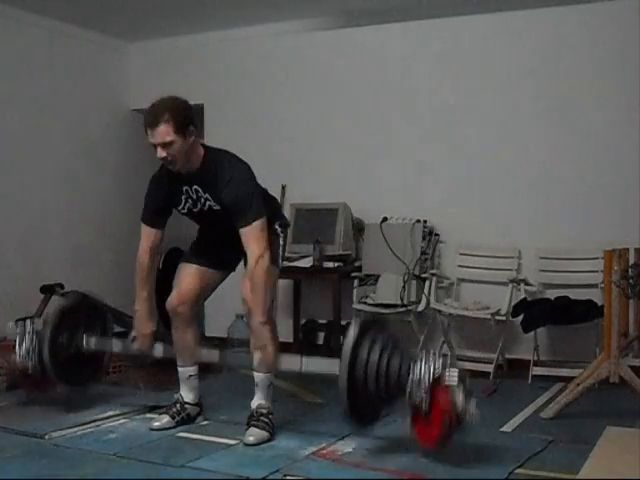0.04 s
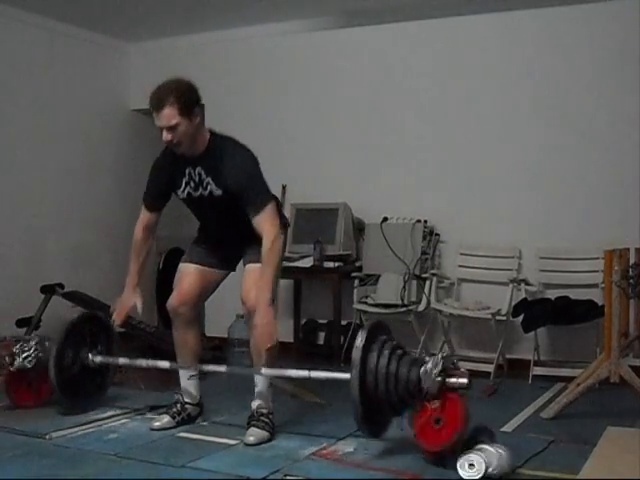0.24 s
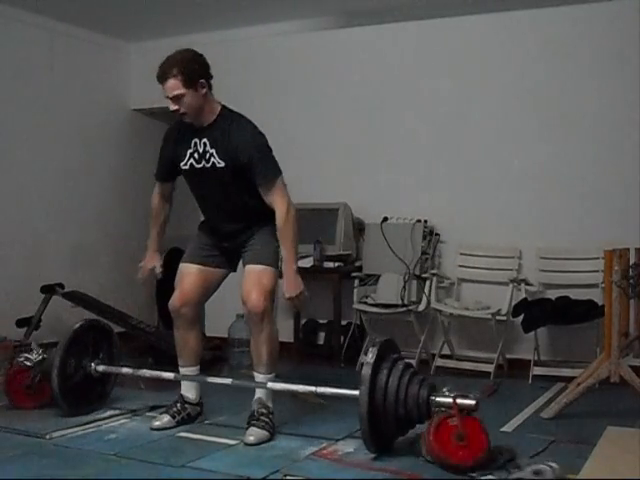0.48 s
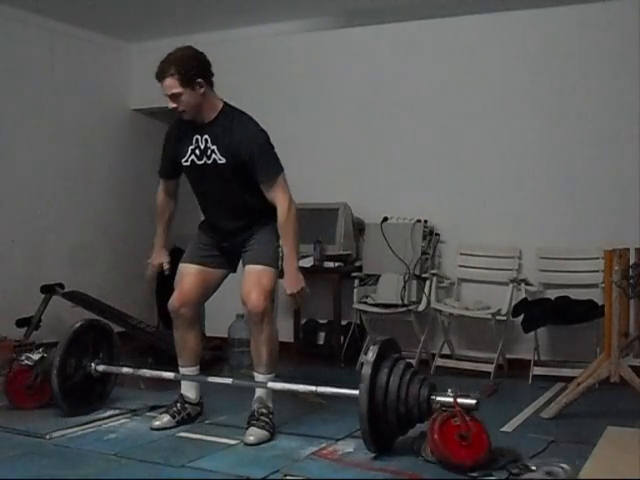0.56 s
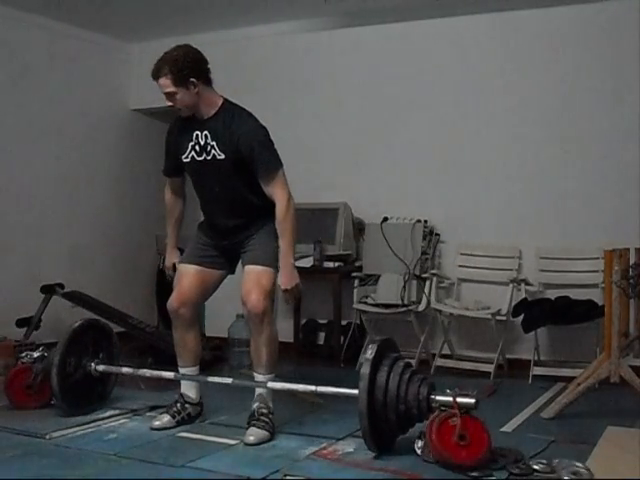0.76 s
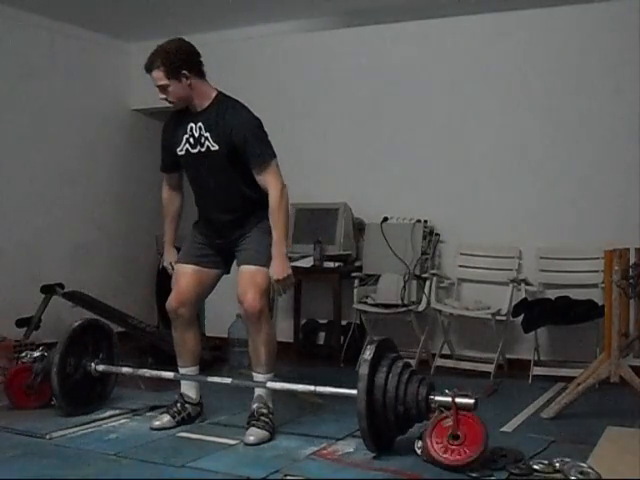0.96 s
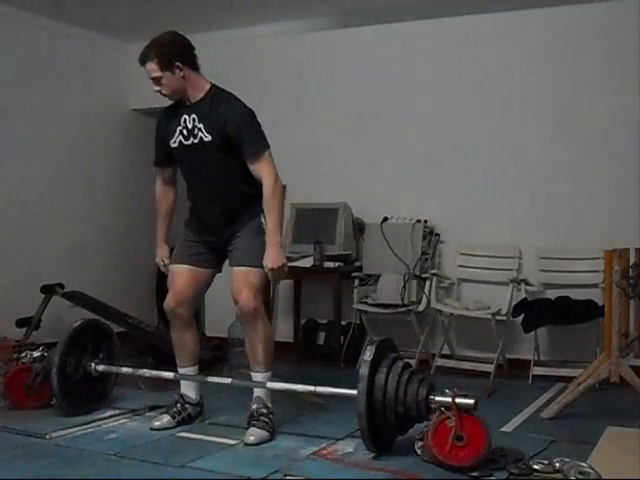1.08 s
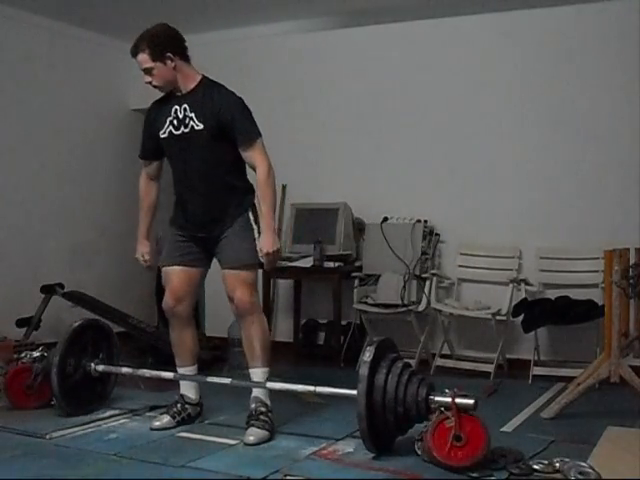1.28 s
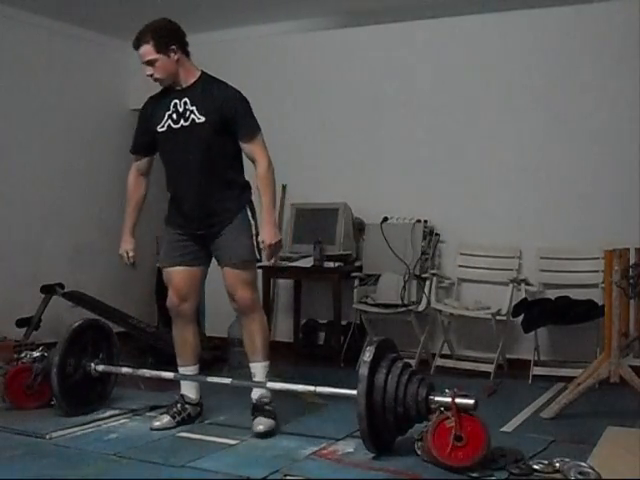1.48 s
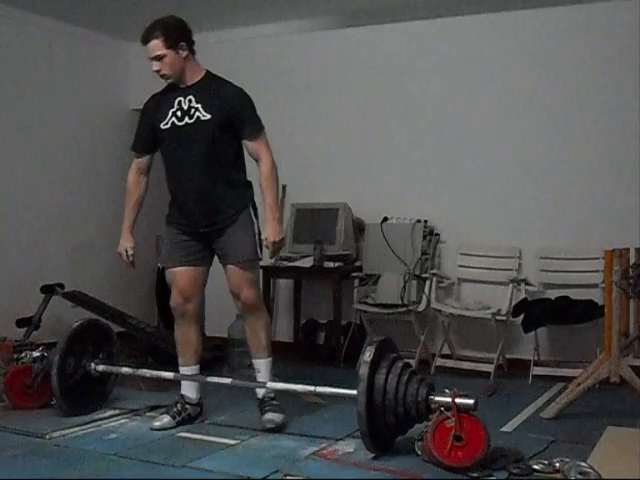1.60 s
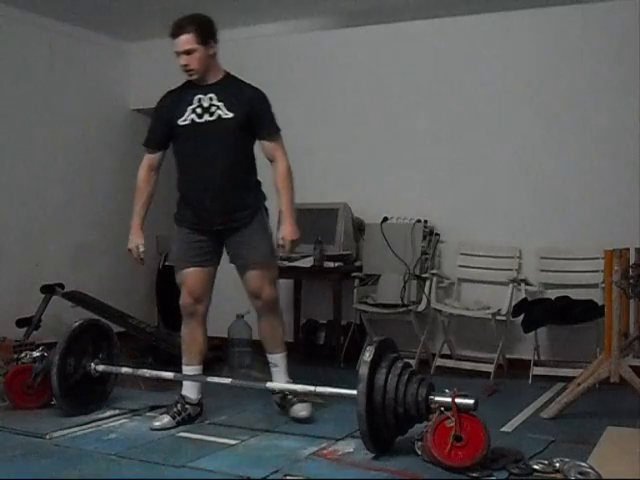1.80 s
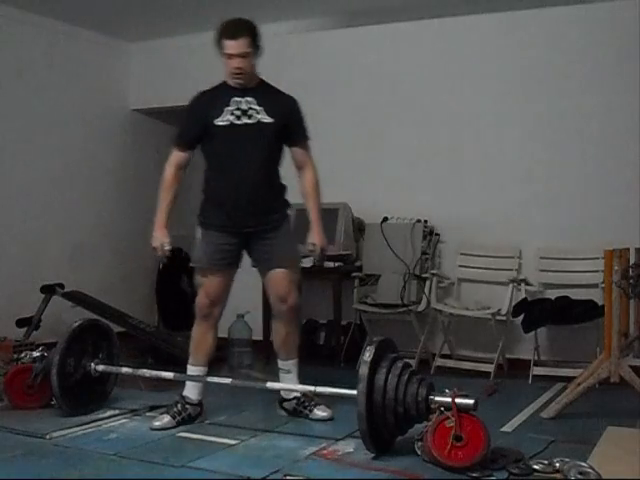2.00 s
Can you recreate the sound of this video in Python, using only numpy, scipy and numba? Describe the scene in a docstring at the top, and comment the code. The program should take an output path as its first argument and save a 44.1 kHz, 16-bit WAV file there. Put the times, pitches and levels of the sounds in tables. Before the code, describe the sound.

Loaded barbell drop: iron plates slam with a deep thud, clatter and jingle, then boomy reverberation fades

```python
"""Loaded barbell drop

A barbell lands on a matted floor in a bare room. Iron plates clink in the fall, crash, bounce and rattle:
random contacts through ringing iron. Chains jingle as random contacts through small, high modes.
Noise bursts thump the floor, pulses set off room resonances, and decaying noise bands give the echo.
Faint hiss lies under it all; a gain control ducks the crash, peaks are rounded and the top is cut.
"""
import sys
import numpy as np
from scipy import signal
from scipy.fft import rfft, irfft
from scipy.io import wavfile
from numba import njit

SR = 44100
rng = np.random.default_rng(int(sys.argv[2]) if len(sys.argv) > 2 else 0)


def put_to_file(sound):
    """Save the sound as 16-bit audio at rate SR, in the file named by the first command-line argument."""
    columns = np.atleast_2d(sound).T  # one column per channel
    safe = np.clip(columns, -1, 1)
    whole_steps = np.round(safe * 32767)
    wavfile.write(sys.argv[1], SR, whole_steps.astype(np.int16))


N = 90404


def undb(db):
    """Decibels to amplitude."""
    return 10 ** (np.asarray(db) / 20)


def unit(x):
    """Scale to unit energy."""
    return x / np.sqrt(np.sum(x ** 2))


def times():
    """Time of each sample, s."""
    return np.arange(N) / SR


def bins_hz():
    """Frequency of each FFT bin."""
    return np.arange(N // 2 + 1) * SR / N


def curve(rows):
    """Gain over time from (time_s, level_db) points."""
    return undb(np.interp(times(), *np.array(rows).T))


def over_pitch(hz, rows):
    """Read (pitch_hz, value) points on a log-frequency axis."""
    pitch_hz, value = np.array(rows).T
    return np.interp(np.log(hz + 1e-9), np.log(pitch_hz), value)


def noise(spectrum):
    """Noise of the given colour, rms 1."""
    white = rfft(rng.standard_normal(N))
    coloured = irfft(white * undb(over_pitch(bins_hz(), spectrum)), N)
    return unit(coloured) * np.sqrt(N)


def fade(t60_s):
    """Exponential decay, 60 dB in t60_s."""
    return np.exp(-np.log(1000) * times() / t60_s)


CONTACT_S = 0.003  # time constant of the onset


def ring(modes):
    """Unit-energy response of decaying modes to a brief contact."""
    tones = np.zeros(N)
    for k, (pitch_hz, level_db, t60_s) in enumerate(modes):
        sign = (-1) ** k
        sine = np.sin(2 * np.pi * pitch_hz * times())
        tones += sign * undb(level_db) * fade(t60_s) * sine
    return unit(tones * (1 - np.exp(-times() / CONTACT_S)))


def struck(spectrum):
    """Minimum-phase unit-energy response: the given colour with the earliest energy."""
    cepstrum = irfft(np.log(undb(over_pitch(bins_hz(), spectrum))), N)
    causal = 2 * cepstrum[:N // 2]
    return unit(irfft(np.exp(rfft(causal, N)), N))


def through(x, response):
    """Pass a sound through a body or a room."""
    return signal.fftconvolve(x, response)[:N]


SCATTER_DB = 2.5  # standard deviation of contact strength


def clicks(rate_per_s):
    """Random contacts of uneven strength and random sign, rms 1."""
    hits = rng.random(N) < rate_per_s / SR
    strength = undb(SCATTER_DB * rng.standard_normal(N))
    sign = np.sign(rng.standard_normal(N))
    return unit(hits * strength * sign) * np.sqrt(N)


# rumble and hiss colour: pitch_hz, relative_db
HISS_COLOUR = [(15, 18), (32, 23), (70, 9), (130, 6), (400, 6.5), (800, 3.5), (1700, -2.5), (10000, -8),
               (13000, -31)]
# slow rise of the hiss: time_s, gain_db (on top of HISS_DB)
HISS_RISE = [(0, -2), (1.3, 1), (2.05, 2.5)]
HISS_DB = -58.5


def hiss():
    """Coloured background noise whose level creeps up."""
    return undb(HISS_DB) * curve(HISS_RISE) * noise(HISS_COLOUR)


# dense short overtones of the plate stack: pitch_hz, relative_db
CLANK_COLOUR = [(60, -15), (220, -2.5), (330, -8), (410, -11.5), (540, -6.5), (660, 2.5), (810, 1.5),
                (890, -15.5), (1060, -1), (1240, -1.5), (1460, -15), (1750, -9), (1880, -9), (2700, -12),
                (3400, -20), (4050, -18.5), (4400, -30.5), (5650, -30.5), (6200, -38.5), (8300, -48),
                (10500, -65.5)]
# ringing of the iron plates: pitch_hz, relative_db, t60_s
PLATE_MODES = [(467.4, -15, 0.6), (623, -6, 0.45), (658.2, 8, 0.19), (676, 18, 0.046), (746, -5.5, 0.053),
               (811.5, 8, 0.24), (1006, -31, 0.062), (1137, 1, .1), (1196, 6, 0.098), (1670, -17.5, .15),
               (1910, -10.5, 0.45), (2180, -22.5, 0.062), (2546, -6, 0.085), (2920, -31.5, .12)]


def plate_body(ring_db):
    """Iron response: dense clank plus modal ring, ring_db relative to the clank."""
    return unit(struck(CLANK_COLOUR) + undb(ring_db) * ring(PLATE_MODES))


LIGHT_RING_DB, HEAVY_RING_DB = -14, 3

# plates shifting on the falling bar: time_s, level_db (before filtering)
FALLING = [(0, -77), (.02, -47), (.07, -57.5), (.09, -43), (.135, -45), (.165, -32.5), (.2, -22.5)]
SHIFTS_PER_S, FALLING_LOW_HZ, FALLING_TOP_HZ = 2900, 350, 2200
FALLING_EDGE_DB = -19.5  # unfiltered share at the hardest push


def falling_plates():
    """Soft band-limited contacts on the iron; harder contacts are brighter."""
    band_hz = [FALLING_LOW_HZ, FALLING_TOP_HZ]
    soft = signal.butter(2, band_hz, "bandpass", fs=SR, output="sos")
    shifts, push = clicks(SHIFTS_PER_S), curve(FALLING)
    edge = undb(FALLING_EDGE_DB) * push / push.max()
    contacts = (signal.sosfilt(soft, shifts) + edge * shifts) * push * ~landed()
    return through(contacts, plate_body(LIGHT_RING_DB))


# landing and bounces: start_s, clank_db (re BLOW_DB), thud_db (re THUD_DB)
BLOWS = [(.207, 0.5, 6.5), (.214, 6, 5), (.236, 9.5, -3), (.26, 2, 0.5), (.275, -0.5, -1.5),
         (.333, 9, -4.5), (.367, -4, -5.5), (.403, -1, -11.5), (.479, 3, 0.5), (.508, -16, 0.5),
         (.535, -0.5, -7), (.572, -3.5, -13), (.605, -20, -14), (0.655, -20, -30), (.73, -27, -11),
         (.828, -31, -14.5), (.913, -22.5, -19.5), (.998, -22.5, -11), (1.045, -31, -14.5),
         (1.098, -19.5, -10.5), (1.224, -38, -18.5)]
# thud colour of the floor: pitch_hz, relative_db
THUD_COLOUR = [(20, -33.5), (35, -11.5), (52, -18), (68, -7.5), (88, -3.5), (108, -3), (165, -2),
               (200, 0.5), (240, -11), (400, -15), (900, -71), (3000, -67)]
# standing waves of the room: pitch_hz, relative_db, t60_s
BOOM_MODES = [(33, -20.5, 10), (71, 14, 3.3), (85.3, -11, 0.78), (130.7, -5, 1.9), (132.42, 3, 3.3),
              (210.8, -5, 1.2), (297, -9.5, 1.7)]
THUD_DB, BOOM_DB = -29, -6  # boom relative to its pushes
THUD_T60_S, THUD_LEAD_S = 0.041, 0.0022  # noise burst decay; lead over the clank


def floor():
    """Each blow thumps the mat (noise burst) and pushes the room's standing waves (pulse)."""
    thuds, pushes = np.zeros(N), np.zeros(N)
    for start_s, _, thud_db in BLOWS:
        start = int((start_s - THUD_LEAD_S) * SR)
        size = undb(THUD_DB + thud_db) * np.sqrt(SR)
        burst = unit(rng.standard_normal(N) * fade(THUD_T60_S))
        thuds[start:] += size * burst[:N - start]
        pushes[start] += size
    boom = undb(BOOM_DB) * through(pushes, ring(BOOM_MODES))
    return through(thuds, struck(THUD_COLOUR)), boom


def landed():
    """True after the first blow."""
    return times() > BLOWS[0][0]


BLOW_DB, CHATTER_PER_S = -27.5, 3800
CHATTER_S = 0.0059  # time constant


def plate_blows():
    """Heavy blows: decaying bursts of chatter that ring the iron fully."""
    contacts = np.zeros(N)
    for start_s, clank_db, _ in BLOWS:
        start = int(start_s * SR)
        chatter = unit(clicks(CHATTER_PER_S) * np.exp(-times() / CHATTER_S))
        contacts[start:] += undb(BLOW_DB + clank_db) * np.sqrt(SR) * chatter[:N - start]
    return through(contacts, plate_body(HEAVY_RING_DB))


# crack colour: pitch_hz, relative_db
CRACK_COLOUR = [(200, -7.5), (340, 0), (450, 10), (530, -0.5), (660, 5), (900, 1), (2200, -1.5),
                (4000, -12), (6000, -20), (8200, -23), (9800, -4), (11000, -25)]
CRACK_DB, CRACK_RISE_S, CRACK_T60_S = -8, 0.0064, 0.08  # level before the envelope


def crack():
    """All the iron slams together at the first landing: one noise burst."""
    age_s = np.maximum(times() - BLOWS[0][0], 0)
    rise = 1 - np.exp(-age_s / CRACK_RISE_S)
    return undb(CRACK_DB - 60 * age_s / CRACK_T60_S) * rise * noise(CRACK_COLOUR)


# loose plate rattle between blows: time_s, level_db
RATTLE = [(.21, -4), (.34, -9), (.44, -8.5), (.55, -8.5), (.72, -29.5), (.86, -24), (1.04, -28.5),
          (1.25, -55.5), (1.42, -65), (1.6, -73.5)]
RATTLE_PER_S = 650


def plate_rattle():
    """Loose plates: random contacts that clank with little ring."""
    contacts = clicks(RATTLE_PER_S) * curve(RATTLE) * landed()
    return through(contacts, plate_body(LIGHT_RING_DB))


# jingle of the chains: time_s, level_db
CHAIN_JINGLE = [(.21, -40.5), (.24, -33.5), (.4, -37.5), (.52, -28.5), (.66, -29.5), (.8, -47.5), (1, -63),
                (1.2, -83)]
# ringing of the links: pitch_hz, relative_db, t60_s
CHAIN_MODES = [(3880, 0, 0.057), (4710, -11, 0.1), (5720, -11.5, 0.034), (6610, -13.5, 0.033),
               (9070, -5, 0.044), (9460, -1.5, 0.034), (9280, -0.5, 0.022), (9820, 6, 0.017)]
CHAIN_PER_S = 1500


def chains():
    """Small links tumble against each other after landing."""
    contacts = clicks(CHAIN_PER_S) * curve(CHAIN_JINGLE) * landed()
    return through(contacts, ring(CHAIN_MODES))


# reverberation: pitch_hz, t60_s
ROOM_T60 = [(60, 3), (115, 2.45), (190, 1.51), (340, 1.55), (600, 1.053), (800, 1.265), (1500, 1.1),
            (4000, 1.133), (10000, 0.73)]
ROOM_DB, WALL_DELAY_S = 0.5, 0.014  # echo relative to direct; first echo


def room(x):
    """Bare walls: dense noise echo with its own decay per band, longest in the bass."""
    echoes, tail = rfft(rng.standard_normal(N)), np.zeros(N)
    centres_hz = np.geomspace(40, 12000, 12)
    for centre_hz, weights in zip(centres_hz, np.eye(len(centres_hz))):
        share = over_pitch(bins_hz(), list(zip(centres_hz, weights)))
        tail += irfft(echoes * share, N) * fade(over_pitch(centre_hz, ROOM_T60))
    wet = undb(ROOM_DB)
    echo = through(x, unit(tail * (times() > WALL_DELAY_S)))
    return (x + wet * echo) / np.hypot(1, wet)


def scene():
    """Plates, chains and thuds in the room, plus boom and hiss."""
    thuds, boom = floor()
    plates = falling_plates() + plate_blows() + plate_rattle()
    return (room(plates + crack() + chains() + thuds) + boom + hiss())[None]


@njit
def follow(x, attack, release):
    """Level follower with separate rise and fall coefficients per sample."""
    out, level = np.empty(len(x)), 0.
    for i in range(len(x)):
        level += (x[i] - level) * (attack if x[i] > level else release)
        out[i] = level
    return out


GAIN_TOP_DB, GAIN_RATIO = -17, 1.87  # threshold; compression ratio
GAIN_ATTACK_S, GAIN_RELEASE_S = 0.013, 0.48  # time constants
CLIP_LEVEL, TOP_HZ = 1.05, 10300


def record(dry):
    """Gain control ducks the crash, tanh rounds the peaks, a steep lowpass cuts the top."""
    level = follow(np.abs(dry[0]), 1 / (GAIN_ATTACK_S * SR), 1 / (GAIN_RELEASE_S * SR))
    gain = np.maximum(level / undb(GAIN_TOP_DB), 1) ** (1 / GAIN_RATIO - 1)
    rounded = CLIP_LEVEL * np.tanh(dry * gain / CLIP_LEVEL)
    lowpass = signal.ellip(8, .2, 70, TOP_HZ, fs=SR, output="sos")  # ripple, stopband in dB
    return signal.sosfilt(lowpass, rounded)


dry = scene()
out = record(dry)
put_to_file(out)
```